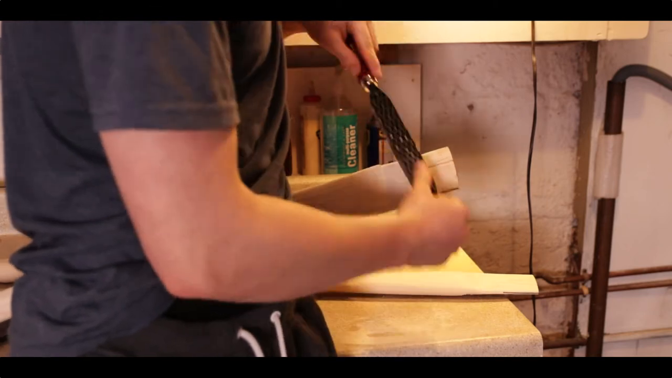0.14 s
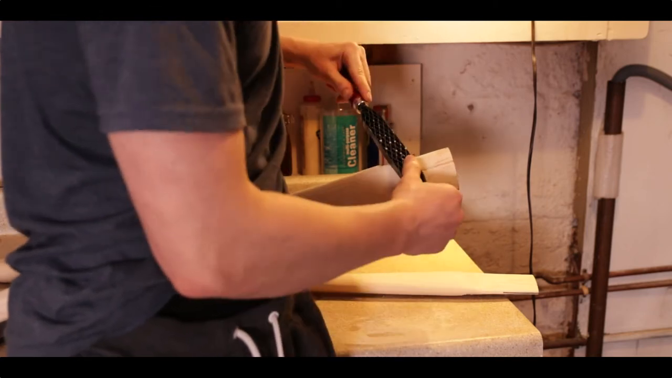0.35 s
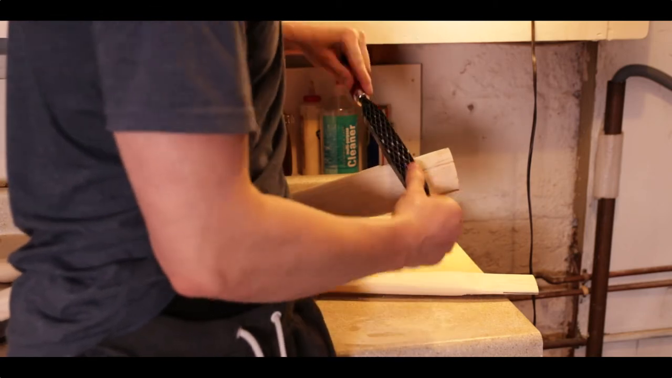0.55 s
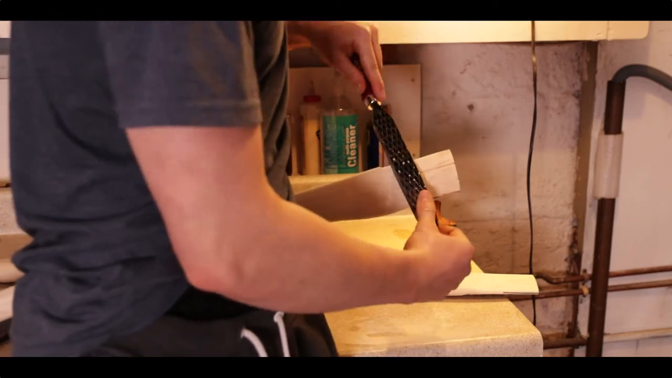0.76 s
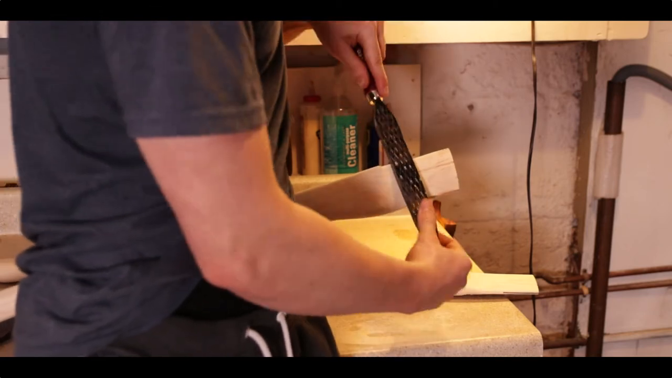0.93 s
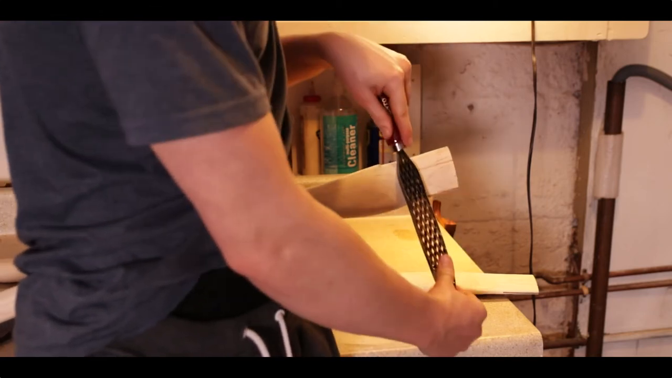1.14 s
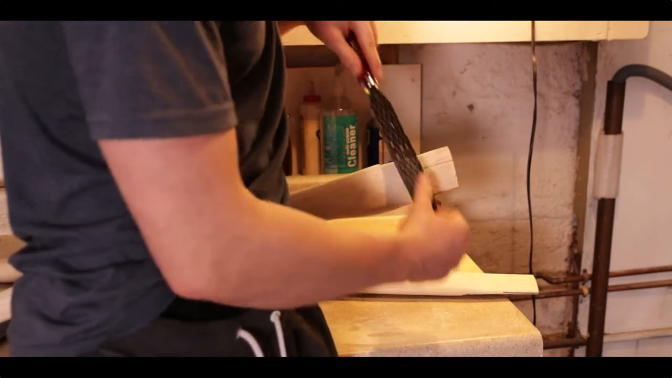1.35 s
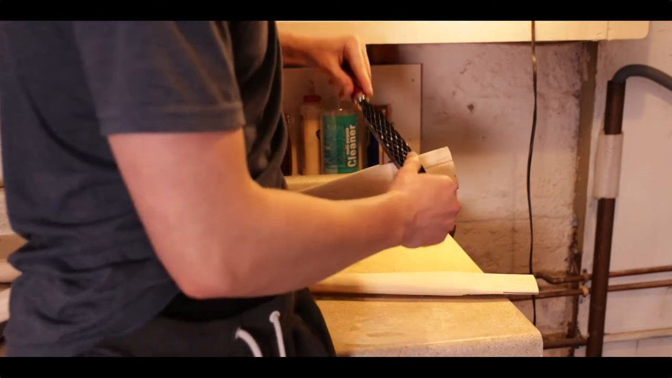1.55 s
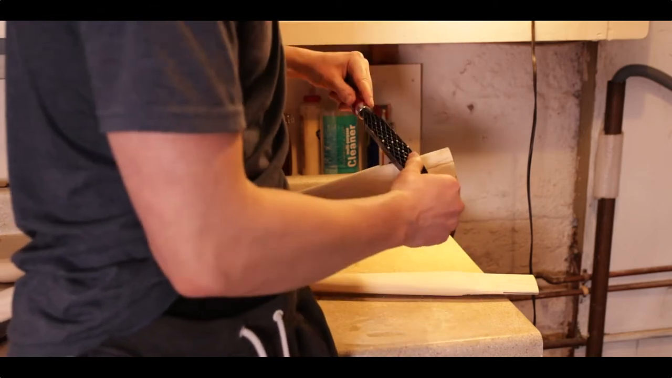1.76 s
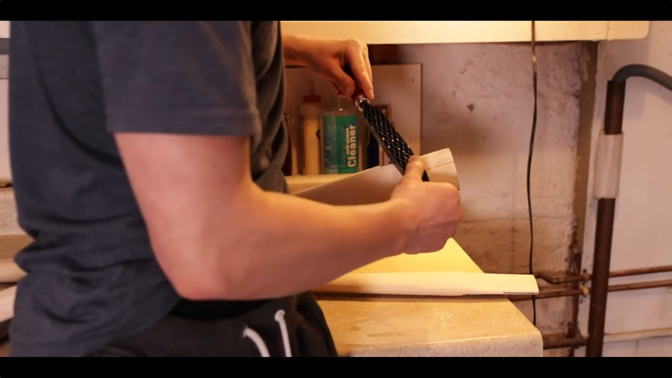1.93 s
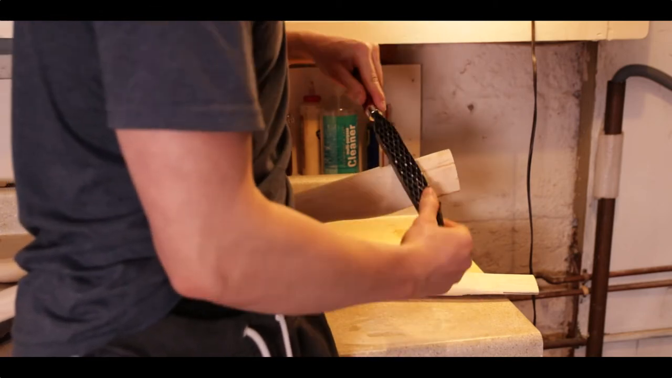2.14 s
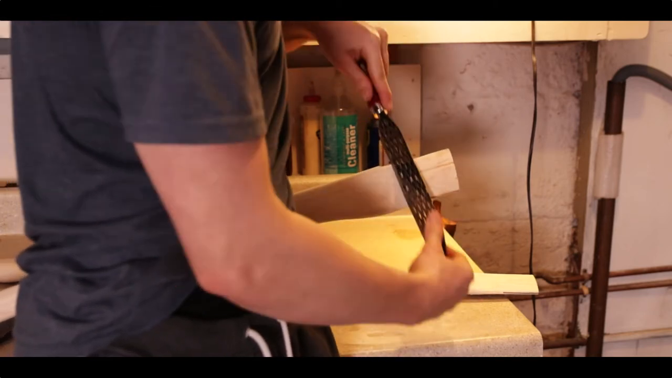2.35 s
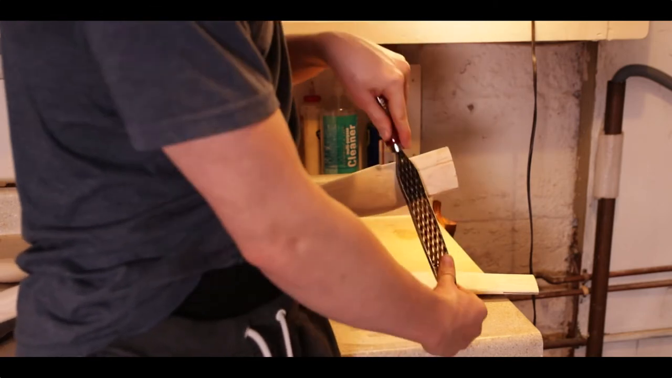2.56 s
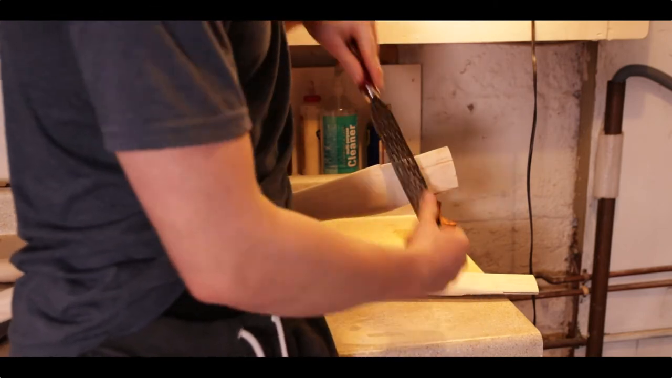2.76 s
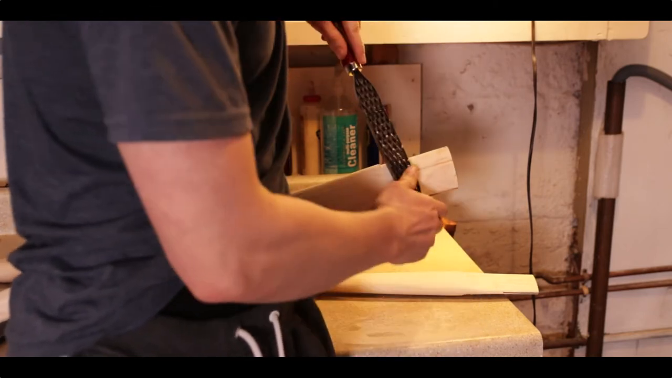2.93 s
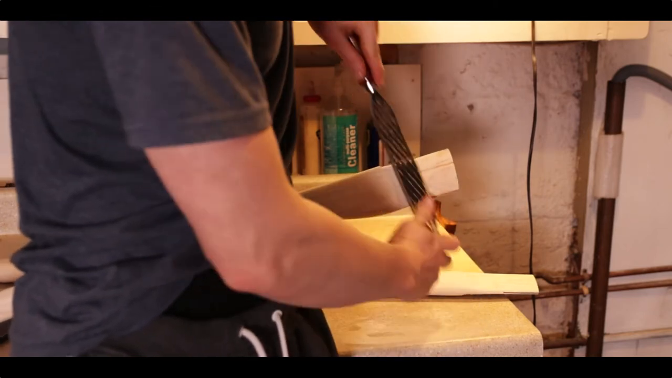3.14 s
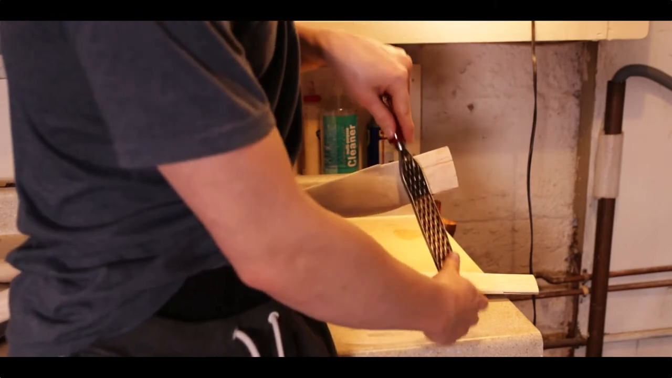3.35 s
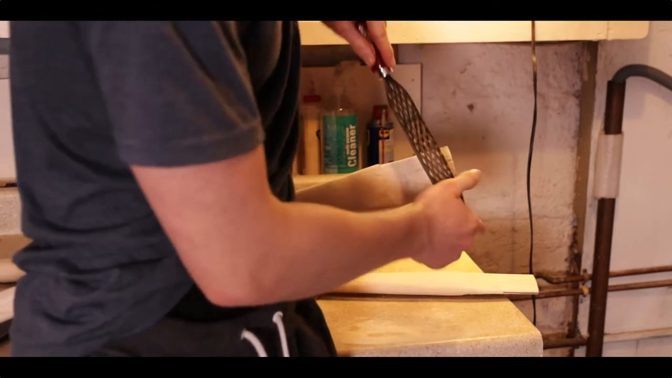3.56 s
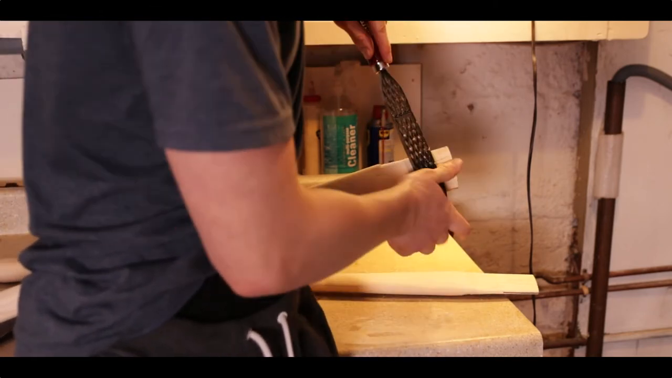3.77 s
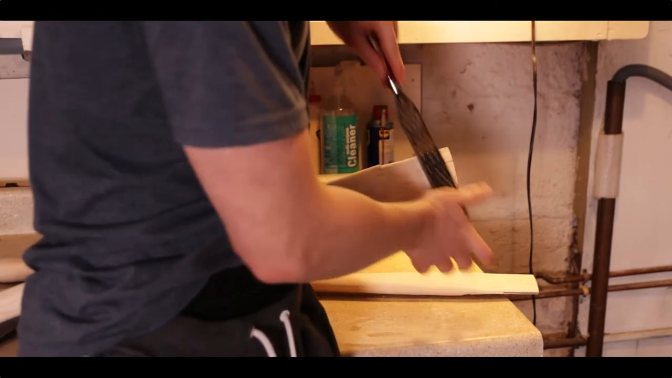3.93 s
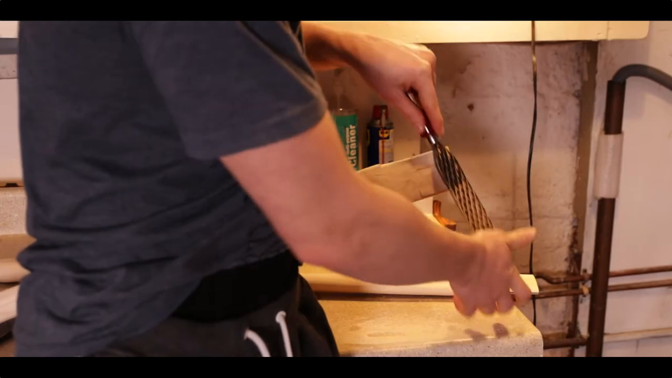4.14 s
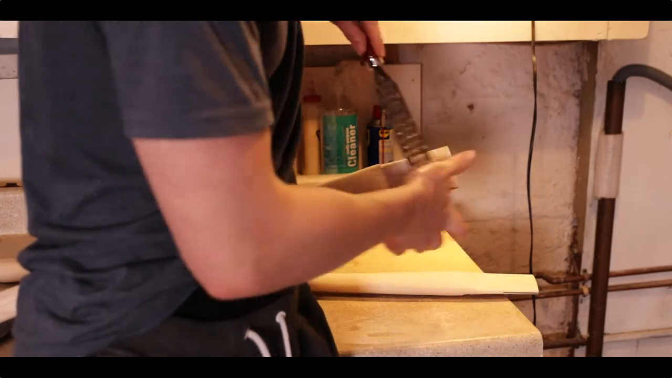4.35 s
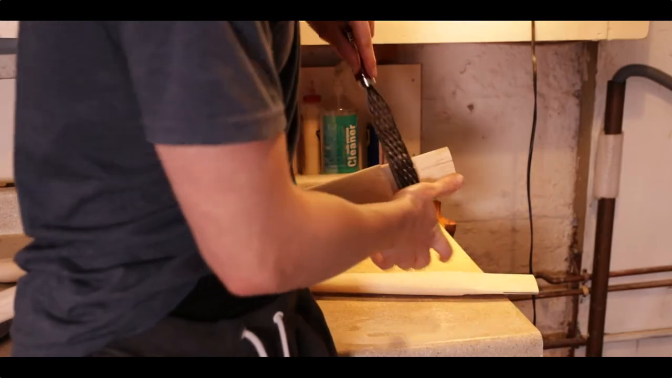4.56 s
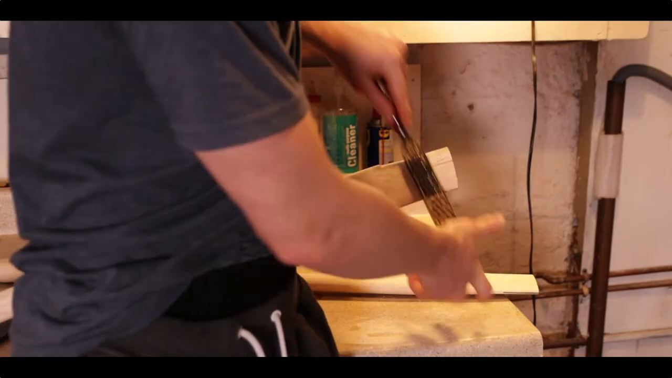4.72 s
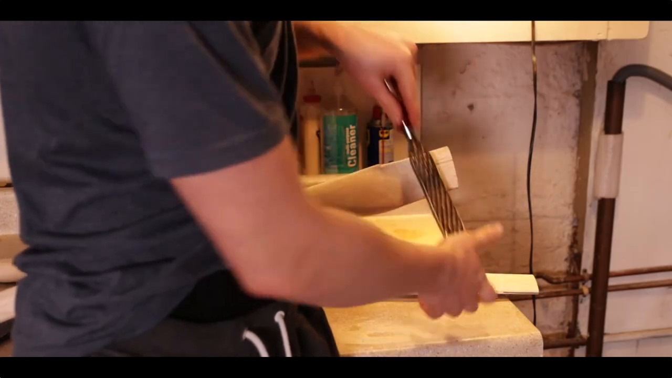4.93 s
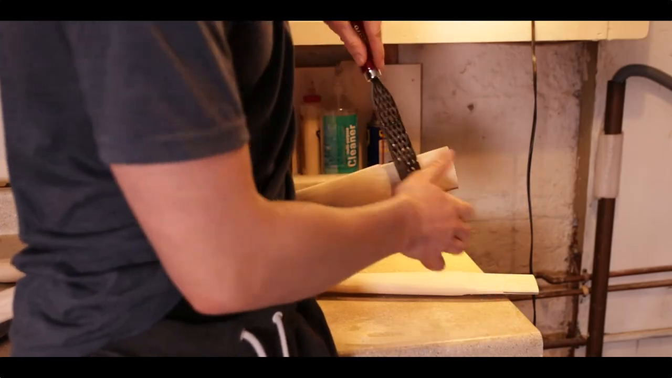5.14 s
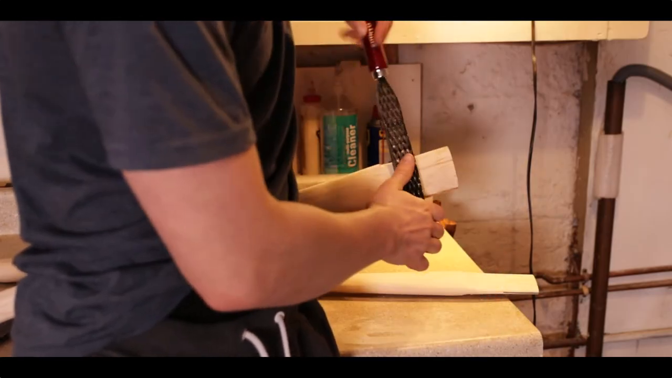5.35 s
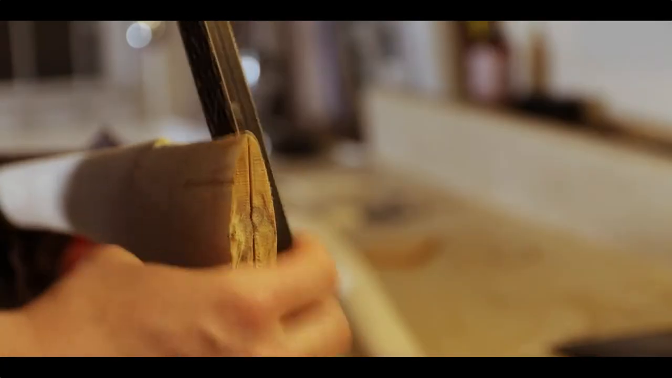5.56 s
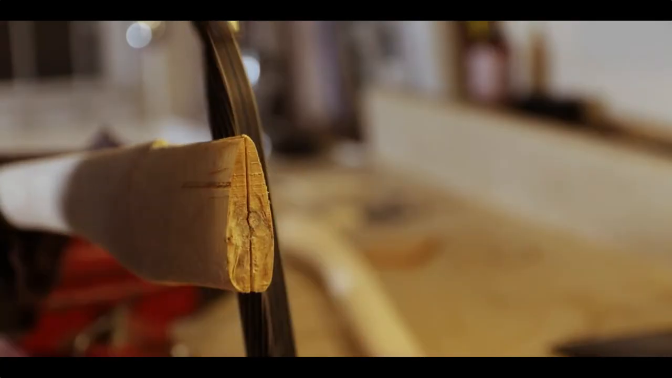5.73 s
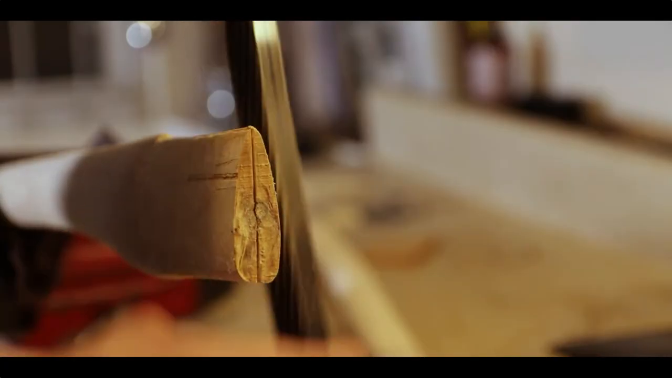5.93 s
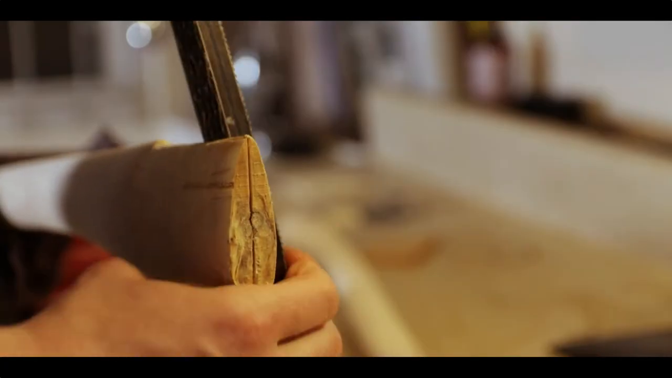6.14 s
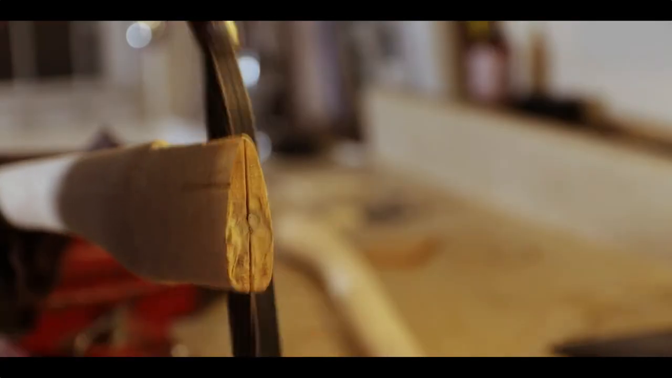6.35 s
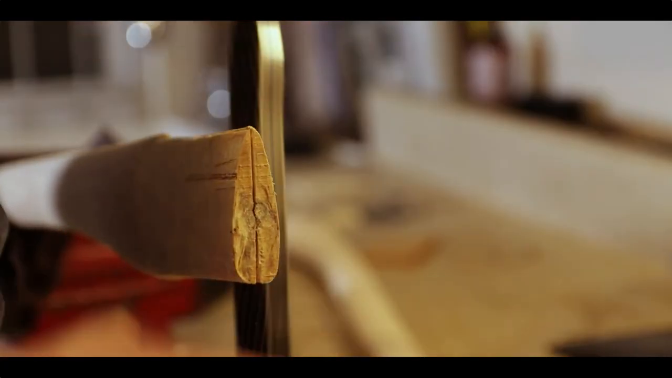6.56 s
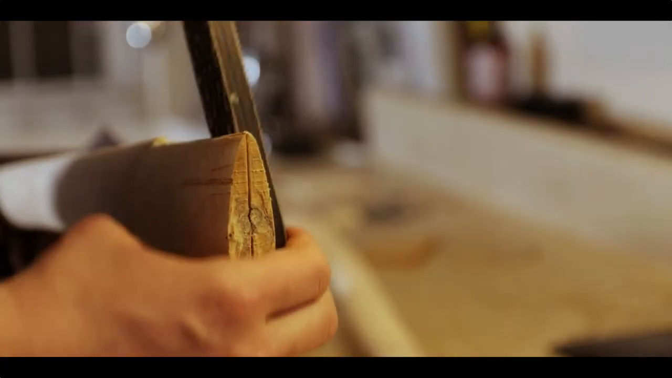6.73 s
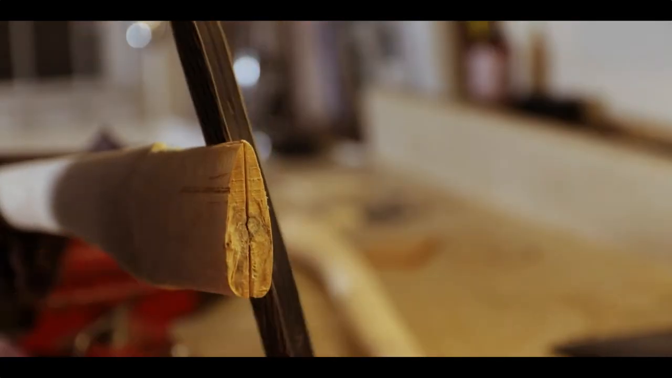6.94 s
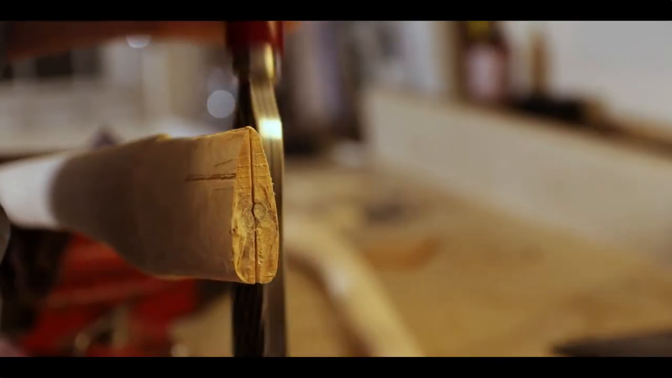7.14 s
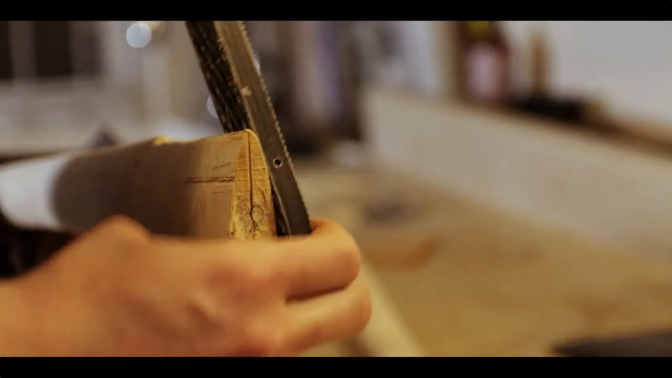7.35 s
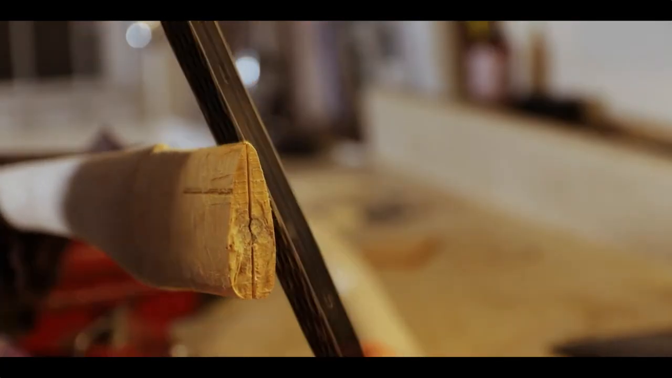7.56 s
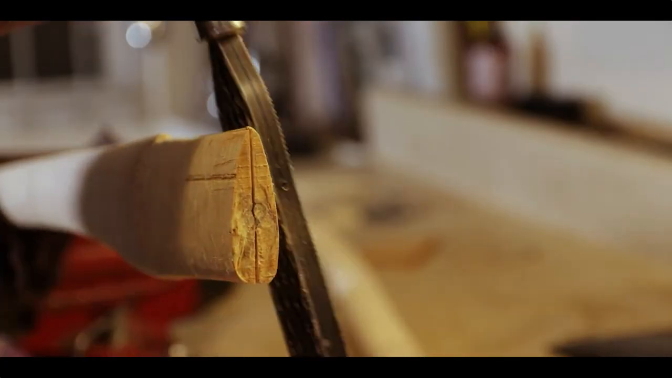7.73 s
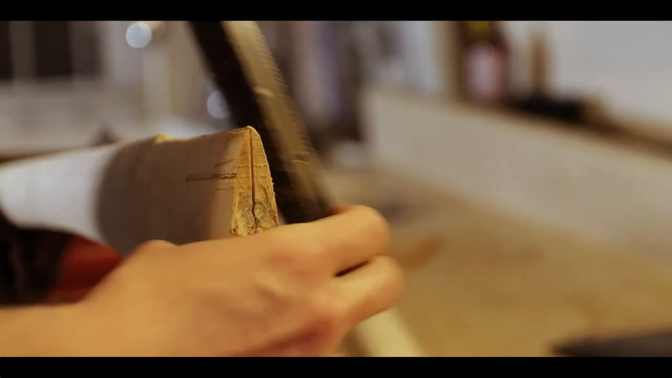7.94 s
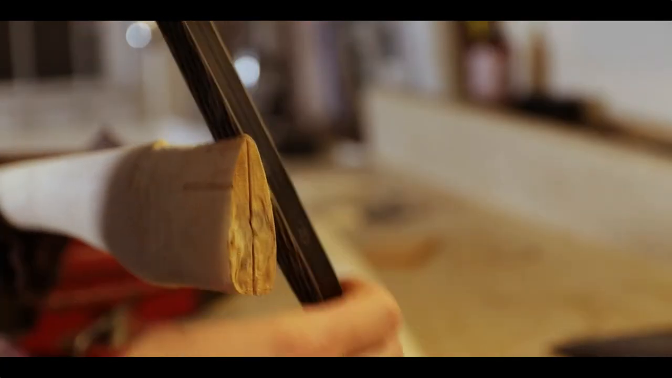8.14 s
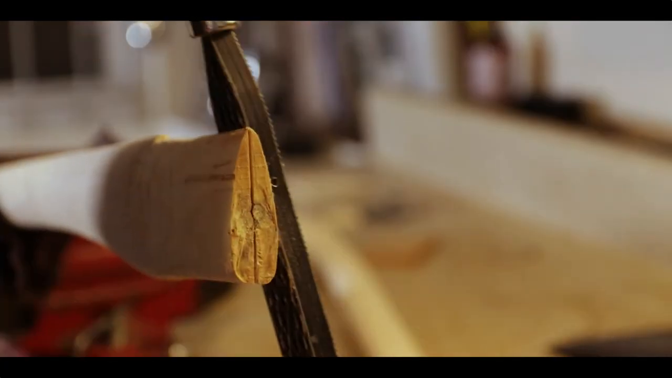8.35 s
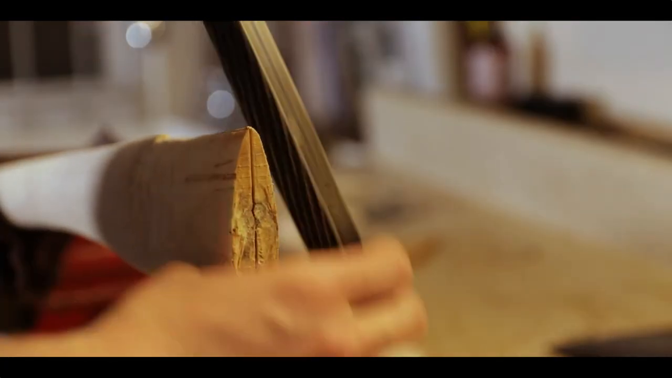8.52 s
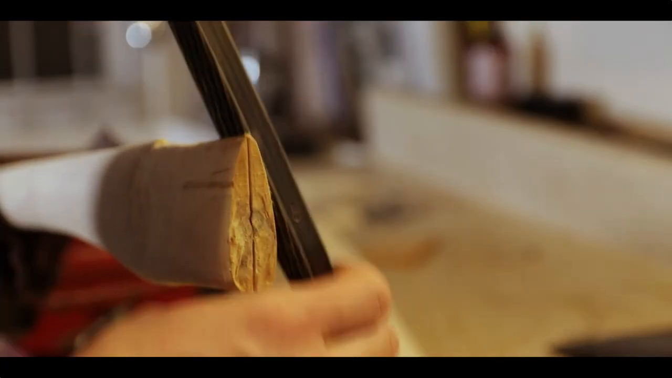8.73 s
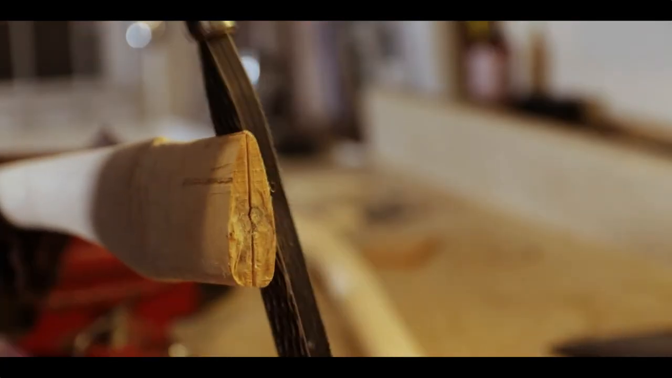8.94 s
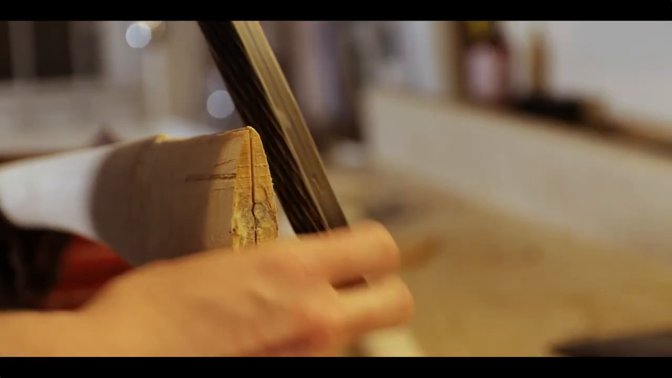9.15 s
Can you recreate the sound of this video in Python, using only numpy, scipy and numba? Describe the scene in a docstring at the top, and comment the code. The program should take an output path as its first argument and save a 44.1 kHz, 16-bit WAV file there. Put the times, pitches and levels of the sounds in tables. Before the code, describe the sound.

Gritty, buzzing scrapes of a rasp on wood, heard at first from a short distance in irregular pushes, with a brief room echo. About halfway the filing pauses and the clamped handle knocks softly in its vice. The sound then moves close up, and the strokes become brisk and regular, each biting hard before running out. The steel taps and chatters on the wood between strokes, over quiet workshop air.

```python
"""A small workshop, where a coarse rasp is pushed along a wooden handle clamped in a vice.
The steel lands with a chatter; rows of teeth then tear the fibres, sometimes catching,
while the wood hums and the blade sings. The clamped handle rocks with faint, hollow knocks.
The first strokes are heard from across the bench, the later ones close up, where the bench shudders too.
A few dry clicks dot the work, and a short room echo and still air lie behind it all."""
import sys
import numpy as np
from scipy import signal
from scipy.fft import rfft, irfft, next_fast_len
from scipy.io import wavfile
from scipy.ndimage import uniform_filter1d
from numba import njit

SR = 44100
rng = np.random.default_rng(int(sys.argv[2]) if len(sys.argv) > 2 else 0)


def put_to_file(sound):
    """Save the sound as 16-bit audio at rate SR, in the file named by the first command-line argument."""
    columns = np.atleast_2d(sound).T  # one column per channel
    safe = np.clip(columns, -1, 1)
    whole_steps = np.round(safe * 32767)
    wavfile.write(sys.argv[1], SR, whole_steps.astype(np.int16))


N = 409688
TIME = np.arange(N) / SR
HIT_TIME, STROKE_TIME = TIME[:SR // 2], TIME[:SR]
CLOSE_FROM_S = 5.49  # scuffs and landings sound close up after this

# Levels in the tables are relative: each layer sets its own gain.
# Swelling strokes across the bench. Each row: start, rise, push length and tearing length in seconds,
# body, cutting and hiss levels in dB, fall in dB per second, first and last tooth pace in Hz,
# blade note in Hz, singing of wood and blade in dB.
FAR_PUSHES = [(0.0, 0.0013, 0.013, .01, -37, -46, -56.5, 100, 445, 470, 3280, -9.5),
              (0.586, 0.023, 0.2, 0.083, -20, -28, -31.5, 168, 480, 450, 3440, -9),
              (0.945, 0.05, .2, 0.2, -17.5, -22.5, -31.5, 180, 562, 550, 3320, -1),
              (2.0, 0.024, 0.22, 0.032, -18, -25, -26.5, 93, 541.6, 450, 3500, -12),
              (2.32, 0.0067, 0.28, 0.29, -18, -27, -39, 98, 585, 505, 3350, -2),
              (2.93, 0.3, 0.37, 0.37, -13, -18.5, -27, 144, 435.4, 684, 3470, 6),
              (3.885, 0.069, 0.26, 0.19, -14, -16.5, -23, 114, 646, 530, 3006, 8.5),
              (4.5, 0.17, 0.36, 0.28, -14, -21.5, -27, 95, 529, 630, 3306, -4)]
# Even strokes close up. Each row: start, rise and push length in seconds, level in dB, seconds until
# the arm eases, hiss lost there in dB, share of pace lost there, first and last blade note in Hz.
NEAR_PUSHES = [(5.604, 0.016, 0.22, -1.5, 0.081, 3.5, 0.02, 3080, 3240),
               (6.203, 0.034, 0.24, -1, 0.079, 0, 0.3, 3460, 3410),
               (6.833, 0.027, 0.27, -1.5, 0.17, 9.5, 0.06, 3060, 3570),
               (7.446, 0.04, 0.27, -1.5, .14, 2, 0.27, 2840, 3390),
               (8.134, .012, 0.22, -3, .1, -1.5, .25, 2850, 3150),
               (8.749, 0.015, 0.23, -2.5, 0.11, 2, 0.3, 2880, 3670)]
# Body, cutting and hiss of a close stroke. Each row: level in dB, boost of the first bite in dB,
# lag of the release in seconds, fall in dB per second.
NEAR_SHAPE = [(-19.5, 4, 0.022, 141), (-20, 7, -0.01, 224), (-26.5, 7, -0.017, 308)]
# Resonances under the pressed rasp. Each row: pitch and width in Hz, far and near lift in dB.
RUBBED_MODES = [(96.1, 6.7, 5, 5), (210.7, 5.9, 15.5, -3), (458, 163, 8.5, -11), (597, 71, -1.5, 4.5),
                (725, 31, 4.5, 18.5), (1340, 45, 6, -27.5), (1905, 26, 7, 15), (2200, 60, 2.5, 11.5),
                (3357, 87, -0.5, -5.5), (3690, 125, -1, 8), (4490, 410, -5.5, 4), (6880, 130, -9, 4),
                (8420, 1100, -1, -5.5), (13000, 390, -8.5, 1)]
# Handle, vice and rasp ringing together. Each row: pitch in Hz, t60 in seconds,
# level when struck and when rocking in dB.
STRUCK_MODES = [(345, .11, 1, -10), (462, .13, 0, 0), (585, .09, -2, -8), (660, .09, -2, -6),
                (1165, .08, -9, -11), (1325, .08, -7, -20), (2235, .2, -9, -38), (3325, .2, -12, -52),
                (3730, .1, -14, -52)]
# The rasp set down on the wood; the row at 5.54 s is a light brush instead. Each row: start in seconds, # level
# in dB, chatter pitch in Hz, thump level in dB, chatter length in seconds, crunch offset from the level in dB.
LANDINGS = [(0.312, -28, 1310, -18, .022, -4.5), (0.59, -19.5, 3450, -18.5, 0.012, -22),
            (0.952, -18.5, 1353, -21, 0.017, -3.5), (1.614, -23, 1408, -18.5, 0.033, -4.5),
            (2.008, -18, 1262, -22, 0.015, -10), (2.954, -15.5, 1347, -34, 0.027, -15),
            (3.769, -19.5, 1320, -23, 0.019, -6), (4.501, -13, 1345, -10.5, 0.025, -15),
            (5.241, -21.5, 1313, -34, 0.02, -7), (5.28, -6, 1330, -23, 0.027, -17.5),
            (5.5, -13.5, 1130, -23, 0.0045, -5), (5.54, -21.5, 990, -17.5, 0.011, -34.5),
            (6.104, -0.5, 3406, -30, 0.0067, -15), (7.38, -17.5, 960, -27, 0.011, -6),
            (8.019, -20, 2230, -20, 0.02, -0.5), (8.651, -10, 2343, -18, 0.018, -6.5),
            (9.272, -18.5, 2380, -16, .014, 0.5)]
# Light brushes of the rasp. Each row: start and length in seconds, body, cutting and hiss levels in dB.
SCUFFS = [(0.412, 0.155, -60, -54.5, -60), (1.293, 0.19, -59, -54, -64), (1.648, 0.11, -45.5, -58, -57),
          (4.982, 0.33, -58, -58, -66), (5.299, .15, -39, -50, -56.5), (5.515, 0.033, -22.5, -27.5, -34.5),
          (6.524, 0.012, -61, -32.5, -44.5), (6.632, 0.016, -58, -43, -38.5),
          (6.689, 0.013, -31.5, -34, -46), (6.751, 0.0084, -27.5, -34, -41),
          (6.783, 0.041, -29.5, -37, -49), (7.255, 0.17, -55, -50.5, -74), (7.389, 0.037, -30.5, -47, -53),
          (7.781, 0.16, -53, -53.5, -69), (7.952, 0.075, -50, -47, -51), (9.111, 0.14, -65, -55.5, -70),
          (9.217, 0.03, -55, -45, -53.5)]
# Small hits. Each row: start in seconds, level in dB.
TICKS = [(0.594, -17), (2.006, -17), (3.479, -13.5), (6.104, -10), (7.381, -30.5), (8.021, -23),
         (8.651, -17.5), (9.273, -16)]  # small, dry clicks
CATCHES = [(0.663, 4.5), (0.762, -4.5), (0.984, -7), (1.001, 0.5), (2.091, 9.5), (2.326, -5), (2.358, -6),
           (2.384, 2), (2.424, 3), (2.485, -2.5), (2.535, -2.5), (4.663, -4), (4.746, -5.5), (4.767, -1.5),
           (5.834, 2), (7.085, -9), (8.38, -7.5), (8.906, -13)]  # teeth snagging in the grain
ROCKS = [(2.786, -25.5), (2.873, -23.5), (4.969, -17.5), (5.05, -15), (5.134, -16), (5.221, -18.5),
         (5.391, -24)]  # the handle rocking in the vice
# Swell of the bench's shudder. Each row: time in seconds, level in dB.
SHUDDER_LEVELS = [(5.3, -71.5), (5.5, -44), (8.5, -39.5), (8.62, -43), (9.09, -36), (9.15, -26.5),
                  (9.2, -26), (9.25, -35), (9.29, -38)]
# Decay of the room. Each row: frequency in Hz, t60 in seconds.
WORKSHOP_DECAY = [(100, 0.79), (700, 0.17), (2000, 0.27), (5000, 0.25), (14000, 0.042)]
# EQ curves, one for each sound. Each row: frequency in Hz, gain in dB.
AIR_EQ = [(12, -46), (20, -4), (123, 8.5), (1150, -10), (1330, -10), (4670, -13), (5080, -13.5),
          (6910, -17.5), (7950, -16), (16000, -19)]
SHUDDER_EQ = [(20, -10), (45, -9), (95, -1), (170, -6), (300, -19), (900, -36), (3000, -112.5)]
FAR_STROKE_EQ = [(40, -54.5), (90, 0), (150, -2), (260, -7), (400, -8), (750, -7), (1000, -7.5), (1600, -8),
                 (3300, -10.5), (5500, -19.5), (10000, -31.5), (14500, -30), (16000, -44)]
NEAR_STROKE_EQ = [(40, -28.5), (90, 3.5), (130, -5), (180, 7), (260, -10), (380, -2), (800, -12.5),
                  (1500, -4.5), (2400, -10), (3000, -9), (5700, -18.5), (8500, -18), (13000, -22),
                  (16000, -35)]
FAR_LANDING_EQ = [(30, -58), (100, 6), (200, -2), (290, -1.5), (420, 3.5), (700, 0.5), (1000, -7.5),
                  (1400, -7.5), (2200, -18), (3800, -20), (5000, -28.5), (16000, -50)]
NEAR_LANDING_EQ = [(30, -27), (140, -15), (330, 7), (700, 3), (1500, -4), (3200, -11.5), (4500, -26.5),
                   (9000, -25.5), (16000, -56)]
CATCH_EQ = [(60, -32.5), (150, -14), (205, 14.5), (260, -1.5), (340, 6.5), (650, 5), (1400, -1), (1550, -4),
            (1800, -1.5), (2600, -13), (4200, -15), (5200, -39.5), (15000, -44.5)]


def amp(db):
    """Decibels to gain."""
    return 10 ** (np.asarray(db) / 20)


def unit(x):
    """Scale to rms 1."""
    return x / np.sqrt(np.mean(x ** 2) + 1e-20)


def along(points, hz):
    """Read (Hz, value) points on a log axis."""
    f, v = np.transpose(points)
    return np.interp(np.log(hz + 1), np.log(f + 1), v)


def wobble(rate):
    """A random curve drawn through rate knots a second."""
    knots = rng.standard_normal(8192)
    return np.interp(TIME * rate, np.arange(len(knots)), knots)


def eq(x, points):
    """Minimum-phase EQ through (Hz, dB) points: nothing rings ahead of an attack."""
    size = 2 * next_fast_len(len(x) // 2 + 4096)
    cepstrum = irfft(np.log(amp(along(points, np.fft.rfftfreq(size, 1 / SR)))), size)
    cepstrum[1:size // 2] *= 2
    cepstrum[size // 2 + 1:] = 0
    return irfft(rfft(x, size) * np.exp(rfft(cepstrum)), size)[:len(x)]


def split(x, low_hz, high_hz):
    """Three-way crossover: lows, mids and highs."""
    def side(v, hz, kind):
        sos = signal.butter(2, hz, kind, fs=SR, output="sos")
        return signal.sosfilt(np.vstack([sos, sos]), v)
    upper = side(x, low_hz, "high")
    return side(x, low_hz, "low"), side(upper, high_hz, "low"), side(upper, high_hz, "high")


def add(track, start, sound):
    """Mix a sound into a track at start seconds."""
    part = track[max(round(start * SR), 0):][:len(sound)]
    part += sound[:len(part)]


@njit
def resonance(x, hz, damping):
    """What x rings up in a resonance that follows the curve hz."""
    out = np.zeros(len(x))
    state = 0j
    for i in range(len(x)):
        step = 2 * np.pi * hz[i] / SR
        loss = damping * step / 2
        state = state * np.exp(-loss + 1j * step) + 2 * loss * x[i]
        out[i] = state.real
    return out


def decay(t60):
    """Envelope of a hit that falls 60 dB in t60 seconds."""
    return amp(-60 * HIT_TIME / t60)


def burst(length, tail_db, t60):
    """Envelope of a skid: a fast attack, a short hold, then a decaying tail."""
    held = 1 / (1 + (HIT_TIME / length) ** 8)
    return (held + amp(tail_db) * decay(t60)) * (1 - np.exp(-HIT_TIME / 0.00085))


def push(rise, release_at, fall_db_per_s):
    """Envelope of one push: pressure builds slowly, then faster, holds and dies away."""
    built = np.clip(STROKE_TIME / rise, 0, 1) ** 2.08
    return built * amp(-fall_db_per_s * np.maximum(STROKE_TIME - release_at, 0))


def glide(starts, lengths, first, last, bend=1):
    """A value that runs from first to last during each stroke; a higher bend makes it turn later."""
    stroke = (np.searchsorted(starts, TIME, "right") - 1).clip(0)
    progress = np.clip((TIME - starts[stroke]) / lengths[stroke], 0, 1)
    return first[stroke] + (last - first)[stroke] * progress ** bend


def room_air():
    """A quiet, steady bed of room tone."""
    return amp(-54.5) * unit(eq(rng.standard_normal(N), AIR_EQ))


def bites(pace_hz, rows_db, clump_db):
    """Force on the wood: rows of teeth strike at the stroke's pace, with fibres snapping between."""
    rows_passed = np.cumsum(pace_hz * (1 + .05 * wobble(110))) / SR
    jitter, strength = rng.standard_normal((12000, 2))[:int(rows_passed[-1])].T
    strikes = np.searchsorted(rows_passed, np.arange(len(jitter)) + .1 * jitter).clip(0, N - 1)
    teeth = np.bincount(strikes, amp(1.7 * strength), N)
    blunt_eq = [(150, -18), (450, 2.5), (800, 0), (1300, -6.5), (16000, -1)]  # the wood yields
    teeth = eq(teeth - teeth.mean(), blunt_eq)
    force = amp(rows_db) * unit(teeth) + snaps(N, spread_db=7)
    return force * amp(clump_db * wobble(170) + 0.69 * wobble(45))  # hard and soft grain


def snaps(size, spread_db):
    """Dense snapping of fibres: most are tiny, a few stand out."""
    return unit(rng.standard_normal(size) * amp(spread_db * rng.standard_normal(size).clip(-3, 2.5)))


def rasping(levels, pace_hz, blade_hz, force, colour, lifts_db, hum_db, blade_db):
    """Bites sound through handle and blade, whose resonances swell and glide as the contact travels."""
    bench = rng.standard_normal(len(HIT_TIME)) * decay(0.19)  # dense modes of vice and bench
    bench = eq(bench / np.linalg.norm(bench), [(500, -12), (1500, -6), (6000, -8)])
    scrape = eq(force + signal.fftconvolve(force, bench)[:N], colour)
    # the wood hums at the pace of the tooth rows
    sound = scrape + amp(hum_db) * resonance(scrape, pace_hz, damping=.13)
    # the free length of the blade picks its two bending notes
    note_hz = blade_hz * (1 + .025 * wobble(20))
    overtone_hz = 2.76 * blade_hz * (1 + 0.055 * wobble(22))
    sound += amp(blade_db) * resonance(scrape, note_hz, damping=.055)
    sound += amp(-3) * resonance(scrape, overtone_hz, damping=0.042)
    for (hz, width, *_), lift_db in zip(RUBBED_MODES, lifts_db):
        mode = signal.lfilter(*signal.iirpeak(hz, hz / width, SR), scrape)
        sound += amp(lift_db + 4.4 * wobble(12)) * mode
    body, cutting, hiss = split(sound, low_hz=1100, high_hz=5000)
    hiss *= amp(3.2 * wobble(170))  # fibres tear off in clumps
    # even out each band, then ride it with its own envelope
    bands = [band / np.sqrt(uniform_filter1d(band ** 2, size=2600)) for band in (body, cutting, hiss)]
    return np.sum(levels * bands, axis=0)


def far_strokes():
    """Each stroke swells and sags; cutting and hiss die faster than the body of the wood."""
    levels = scuffing(close=False)
    body, cutting, hiss = levels
    for start, rise, length, tearing, body_db, cutting_db, hiss_db, fall, *_ in FAR_PUSHES:
        sag_db = 21 * np.clip(STROKE_TIME - rise, 0, length)  # the arm eases off
        add(body, start, amp(body_db - sag_db) * push(rise, length, fall))
        add(cutting, start, amp(cutting_db - sag_db) * push(rise, length, 1.46 * fall))
        add(hiss, start, amp(hiss_db - sag_db) * push(rise, tearing, 1.48 * fall))
    hiss *= skipping()
    starts, _, lengths, *_, first_hz, last_hz, note_hz, sing_db = np.transpose(FAR_PUSHES)
    pace_hz = glide(starts, lengths, first_hz, last_hz, bend=5)
    blade_hz = glide(starts, lengths, note_hz, note_hz - 130)
    singing_db = glide(starts, lengths, sing_db, sing_db)
    force = bites(pace_hz, rows_db=-17, clump_db=2)
    lifts_db = np.array(RUBBED_MODES)[:, 2]
    return amp(-3.5) * rasping(levels, pace_hz, blade_hz, force, FAR_STROKE_EQ, lifts_db,
                               hum_db=6.5 + singing_db, blade_db=0.5 + singing_db)


def workshop_echo(send):
    """The walls answer after a short pre-delay; the top end dies first."""
    hz, t, noise = signal.stft(rng.standard_normal(SR // 2), SR, nperseg=256)
    fade = amp(-60 * t / along(WORKSHOP_DECAY, hz)[:, None])
    tail = signal.istft(noise * fade, SR, nperseg=256)[1]
    return signal.fftconvolve(np.pad(send, (300, 0)), tail / np.linalg.norm(tail))[:N]


def landings():
    """The steel lands and chatters; teeth crunch, the modes ring and the handle sways into a thump."""
    out = np.zeros(N)
    for start, db, chatter_hz, thump_db, length, crunch_db in LANDINGS:
        # uneven bounces blur the note
        drift = np.cumsum(uniform_filter1d(rng.standard_normal(len(HIT_TIME)), size=22))
        note = np.sin(2 * np.pi * chatter_hz * HIT_TIME + drift * chatter_hz / 14000)
        chatter = amp(db - 8) * note * burst(length, tail_db=-20, t60=.1)
        colour = NEAR_LANDING_EQ if start > CLOSE_FROM_S else FAR_LANDING_EQ
        grit = fibre_grit(colour, spread_db=13)
        crunch = amp(db + crunch_db - 2) * grit * burst(length, tail_db=-6, t60=0.4)
        modes = amp(db - 18) * ring(np.array(STRUCK_MODES)[:, 2], attack_cycles=3.5, vary_db=5.5)
        sway = decay(0.17) * (1 - np.exp(-(HIT_TIME / 0.026) ** 2))
        thump = amp(thump_db + 10) * np.sin(2 * np.pi * 208 * HIT_TIME + 0.053 * drift) * sway
        add(out, start, chatter + crunch + modes + thump)
    return out


def fibre_grit(colour, spread_db):
    """Snapping fibres through an EQ: the noisy layer of a hit."""
    return unit(eq(snaps(len(HIT_TIME), spread_db), colour))


def ring(levels_db, attack_cycles, vary_db):
    """Handle, vice and rasp ring, each mode at a new strength and phase for every blow."""
    hz, t60 = np.transpose(STRUCK_MODES)[:2, :, None]
    gains = amp(levels_db[:, None] + vary_db * rng.standard_normal(hz.shape))
    waves = np.sin(2 * np.pi * (hz * HIT_TIME + rng.random(hz.shape)))
    attack = 1 - np.exp(-HIT_TIME * hz / attack_cycles)
    return np.sum(gains * waves * attack * decay(t60), axis=0)


def scuffing(close):
    """Body, cutting and hiss envelopes as the rasp brushes the wood between strokes, far or close."""
    levels = np.zeros((3, N))
    for start, length, *bands_db in SCUFFS:
        if (start > CLOSE_FROM_S) == close:
            for level, db in zip(levels, bands_db):
                add(level, start, amp(db) * push(rise=.012, release_at=length, fall_db_per_s=355))
    return levels


def ticks():
    """Small, dry clicks: most come as the rasp lands, one stands alone."""
    out = np.zeros(N)
    for start, db in TICKS:
        spit = rng.standard_normal(len(HIT_TIME)) * decay(0.011)
        click = eq(spit, [(1500, -24), (3000, -6), (16000, -20.5)])
        add(out, start, amp(db) * click / np.abs(click).max())
    return out


def catches():
    """A snagged row of teeth lets go in a short, dull tearing burst."""
    out = np.zeros(N)
    for start, db in CATCHES:
        tear = fibre_grit(CATCH_EQ, spread_db=4.5)
        add(out, start, amp(db - 17.5) * tear * burst(length=0.0096, tail_db=1.5, t60=0.3))
    return out


def skipping():
    """Ducks the hiss: the harder a catch, the less the skipping teeth tear just after it."""
    dip = (1 - np.exp(-STROKE_TIME / .012)) * np.exp(-STROKE_TIME / 0.066)
    loss_db = np.zeros(N)
    for start, db in CATCHES:
        add(loss_db, start, 2 * amp(db) * dip)
    return amp(-loss_db)


def rocking():
    """The handle nods in the vice jaws with soft, hollow, slightly scuffed knocks."""
    out = np.zeros(N)
    for start, db in ROCKS:
        scuff = fibre_grit([(100, -15), (500, 0), (1200, -6), (3500, -34), (16000, -65)], spread_db=3)
        knock = ring(np.array(STRUCK_MODES)[:, 3], attack_cycles=2.5, vary_db=1.5)
        add(out, start, amp(db - 2.5) * (knock + amp(-16) * scuff * decay(.12)))
    return out


def bench_shudder():
    """The bench rumbles under the worker's weight."""
    swell = amp(np.interp(TIME, *np.transpose(SHUDDER_LEVELS)))
    return swell * unit(eq(rng.standard_normal(N), SHUDDER_EQ))


def near_strokes():
    """Each stroke bites hard, slows for a moment on the way, then runs out."""
    full_pace_hz, idle_slowing = 730, .15  # outside a push the pace drops by this share
    levels = scuffing(close=True)
    pace_share = np.full(N, 1 - idle_slowing)
    first_bite = np.exp(-(STROKE_TIME / 0.043) ** 2)
    for start, rise, length, db, easing_at, hiss_loss_db, pace_loss, *_ in NEAR_PUSHES:
        easing = np.exp(-((STROKE_TIME - easing_at) / .035) ** 2)
        losses_db = (0, 0.61 * hiss_loss_db, hiss_loss_db)
        for level, (band_db, bite_db, lag, fall), loss_db in zip(levels, NEAR_SHAPE, losses_db):
            gain = amp(db + band_db + bite_db * first_bite - loss_db * easing)
            add(level, start, gain * push(rise, length + lag, fall))
        speed_up = idle_slowing * push(rise, length + .04, fall_db_per_s=50)
        add(pace_share, start, speed_up - pace_loss * easing)
    starts, _, lengths, *_, first_hz, last_hz = np.transpose(NEAR_PUSHES)
    pace_hz = full_pace_hz * pace_share.clip(.5, 1)
    blade_hz = glide(starts, lengths, first_hz, last_hz, bend=0.84)
    force = bites(pace_hz, rows_db=-13, clump_db=3)
    lifts_db = np.array(RUBBED_MODES)[:, 3]
    return rasping(levels, pace_hz, blade_hz, force, NEAR_STROKE_EQ, lifts_db, hum_db=13, blade_db=10)


def scene():
    """Mono mix of strokes and knocks with their echo, over room tone and bench rumble."""
    strokes = far_strokes() + near_strokes()
    knocks = landings() + catches() + rocking() + ticks()
    echo = workshop_echo(amp(-12) * strokes + amp(-12.5) * knocks)
    return (strokes + knocks + echo + room_air() + bench_shudder())[None]


def record(dry):
    """The loudest peaks clip at full scale, then a steep low-pass trims the very top."""
    size = next_fast_len(N + 8192)
    passband = np.fft.rfftfreq(size, 1 / SR) < 16200
    return irfft(rfft(np.clip(dry, -1, 1), size) * passband, size)[:, :N]


dry = scene()
out = record(dry)
put_to_file(out)
```